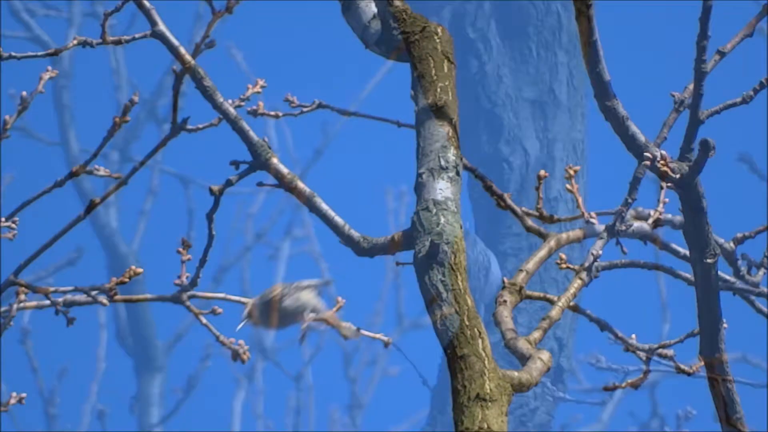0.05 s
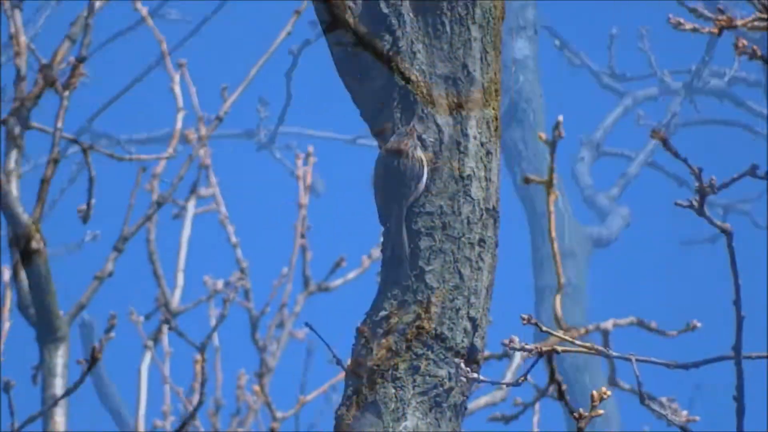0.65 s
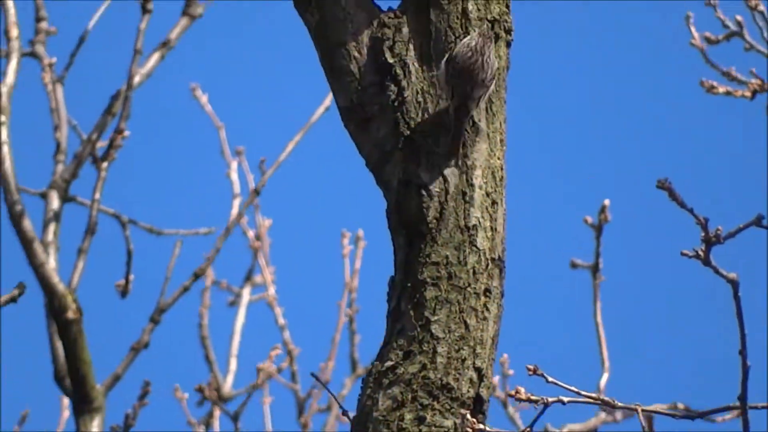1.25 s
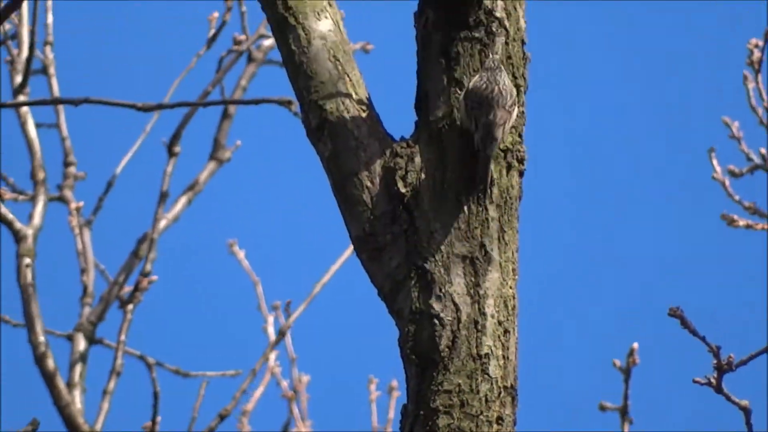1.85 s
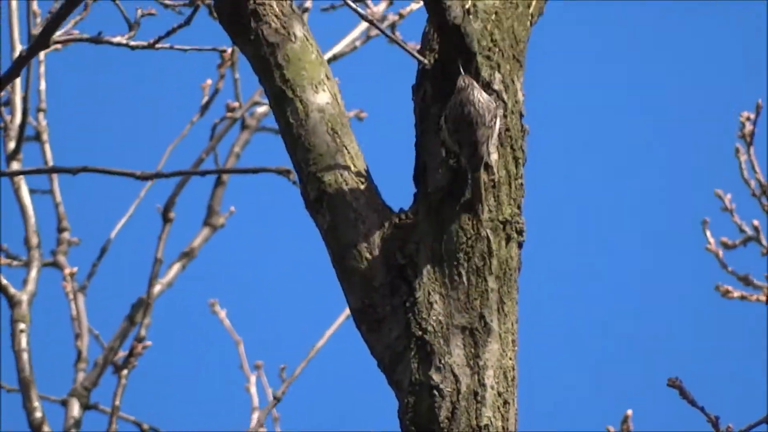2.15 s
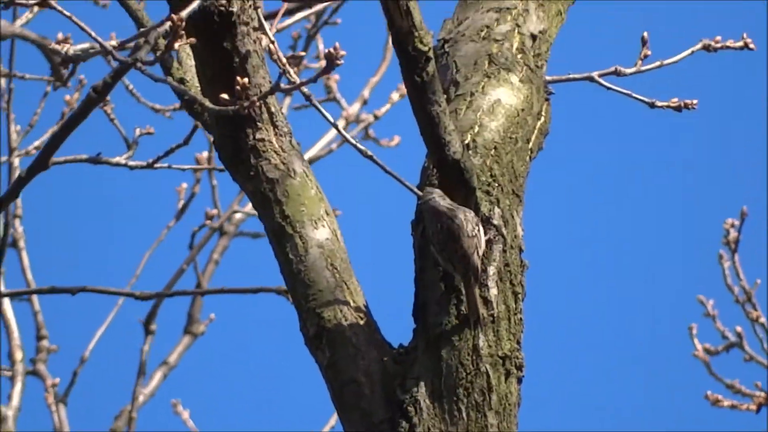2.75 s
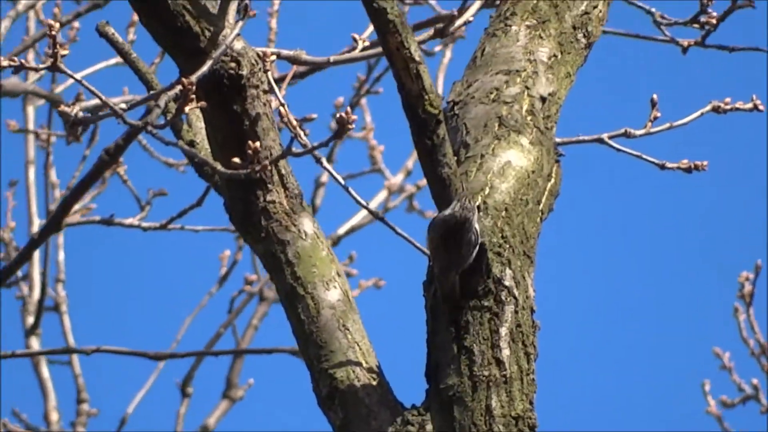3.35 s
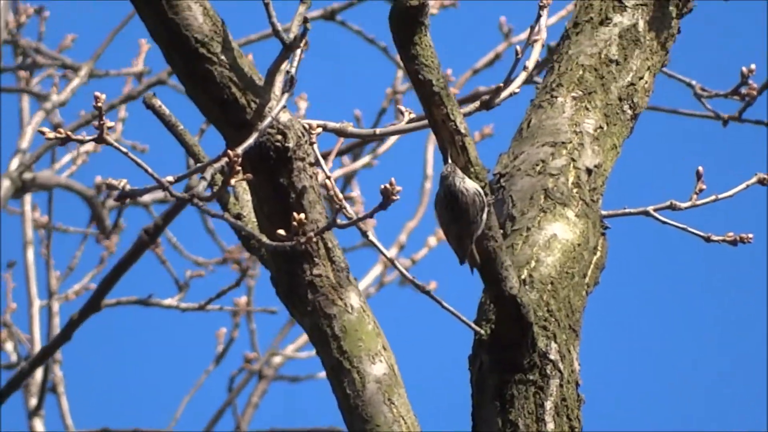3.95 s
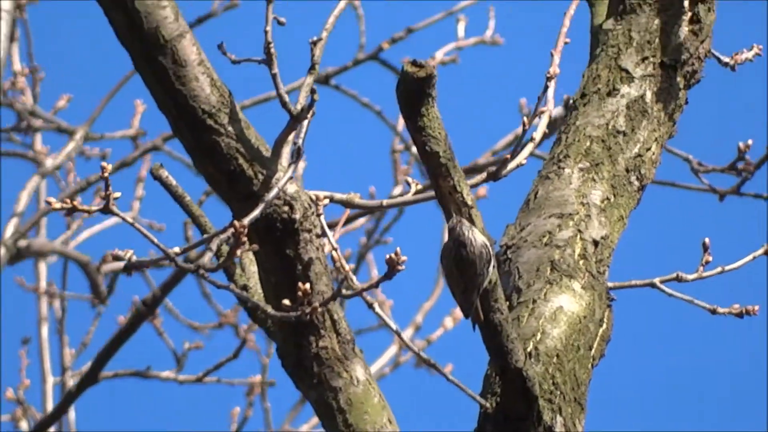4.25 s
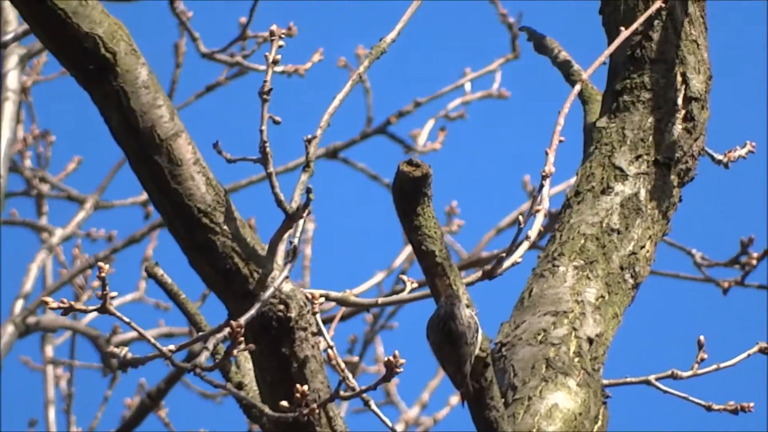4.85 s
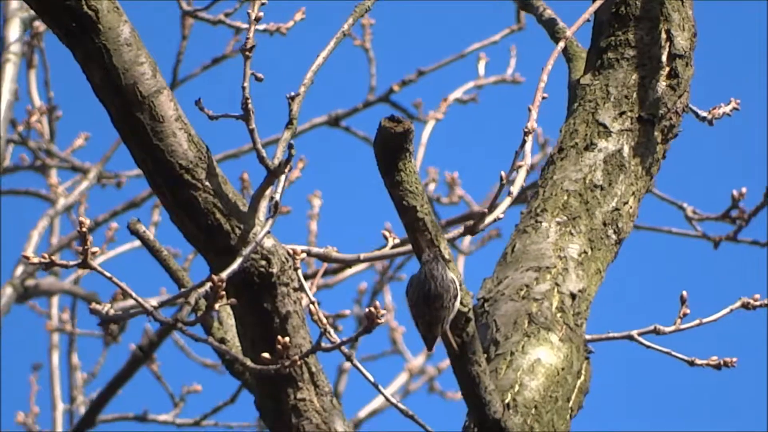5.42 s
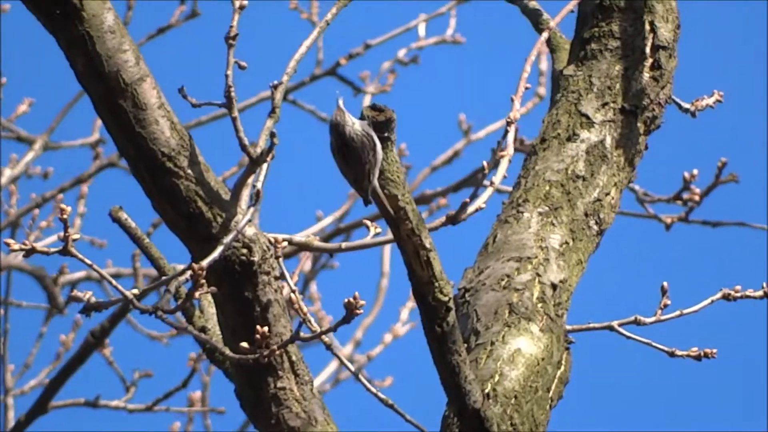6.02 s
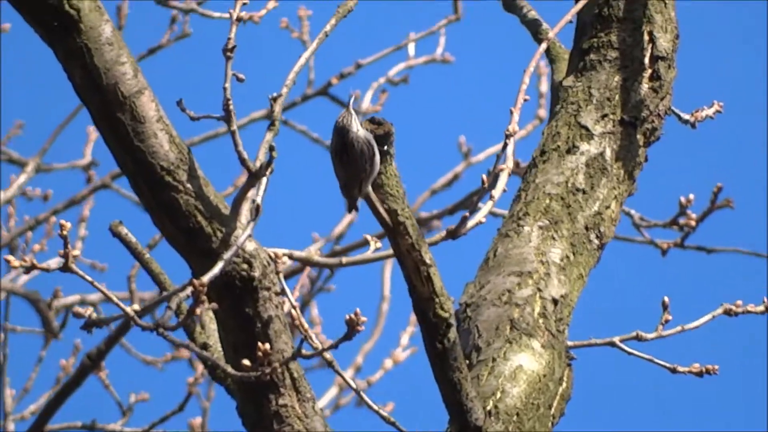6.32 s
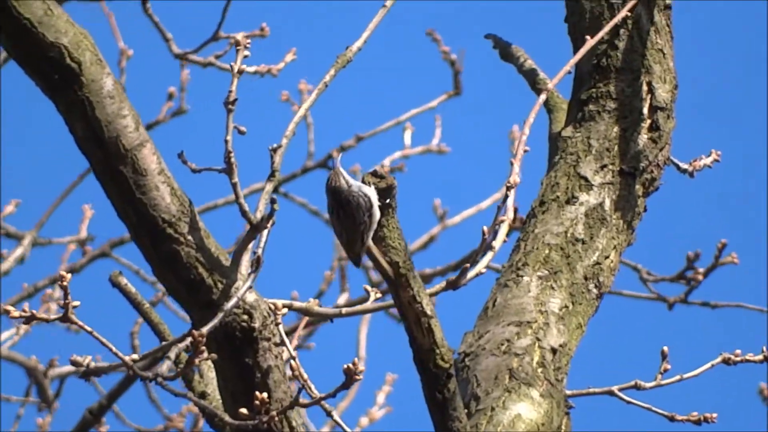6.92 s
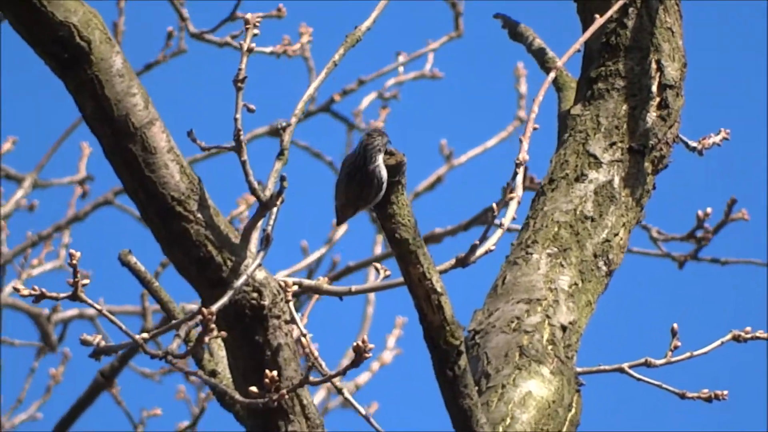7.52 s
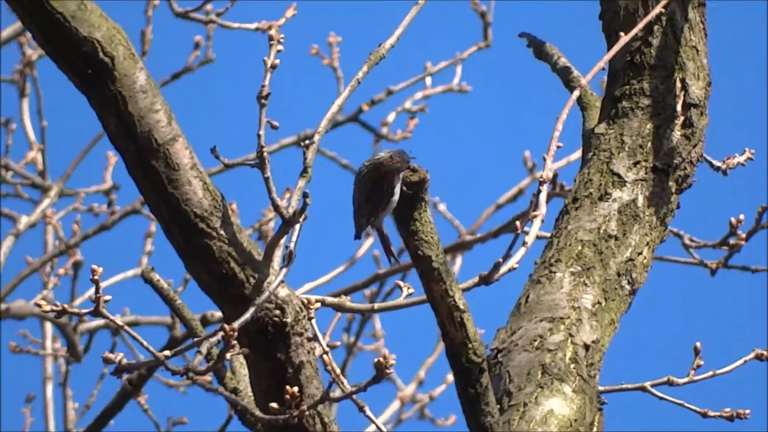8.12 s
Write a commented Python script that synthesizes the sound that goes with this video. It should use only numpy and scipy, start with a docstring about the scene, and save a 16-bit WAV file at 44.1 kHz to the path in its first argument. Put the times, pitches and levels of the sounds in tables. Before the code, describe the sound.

Small birds warble in a quiet wood, with one sharp click, a slowing, falling series of whistles, then a close, thin song ending in a trill.

```python
"""Warblers slur falling phrases over a faint hush in a bare wood in early spring. One sharp click snaps
close by; just after it the hush drops abruptly and the opening songs stop short. The warbling resumes,
two piping calls follow, and a woodpecker gives twelve whistles that sink and slow. Last, a treecreeper
close by sings thin notes ending in a trill. The songs are gliding tones with a slight tremor; trunks
scatter every call, and the distant birds arrive mostly as echo."""
import sys
import numpy as np
from scipy import signal
from scipy.fft import rfft, irfft, next_fast_len
from scipy.io import wavfile
from scipy.ndimage import uniform_filter1d

SR = 44100
rng = np.random.default_rng(int(sys.argv[2]) if len(sys.argv) > 2 else 0)


def transcribe(u):
    """Save the signal u as a 16-bit wav file named by the first command-line argument.

    u: samples, shape (n,) or (channels, n), limited to [-1, 1]; the rate is SR.
    q: integer samples, one column per channel.
    """
    v = np.clip(np.atleast_2d(u).T, -1, 1)
    q = np.round(v * 32767).astype(np.int16)
    wavfile.write(sys.argv[1], SR, q)


N = 360738
TIME = np.arange(N) / SR
PROGRESS = np.linspace(0, 1, 101)   # the way through a note, start to end
DROP_S = 1.205   # the hush drops and the opening songs stop


def from_db(db):
    return 10 ** (np.asarray(db) / 20)


def unit_rms(x):
    return x / np.sqrt(np.mean(x ** 2) + 1e-20)


def fader(points):
    """A level curve in dB, sample by sample."""
    return np.interp(TIME, *np.transpose(points))


def at_hz(points, hz):
    """Read a table on a log-frequency axis."""
    freqs, values = np.transpose(points)
    return np.interp(np.log(hz + 1e-9), np.log(freqs), values)


def add(track, start_s, sound):
    """Mix a sound into a track."""
    at = round(start_s * SR)
    first, last = max(at, 0), min(at + len(sound), N)
    track[first:last] += sound[first - at:last - at]


def pan(x, left_db):
    """Lean a sound left by a level difference; negative leans right."""
    return x * from_db(np.array([[left_db], [-left_db]]) / 2)


def contour(start, length, hz, db):
    """One note as points of (time [s], pitch [Hz], level [dB])."""
    return np.column_stack(np.broadcast_arrays(start + length * PROGRESS, hz, db))


def swell(edge_db):
    """Envelope of a slurred note in dB: loudest in its middle."""
    return edge_db * (2 * PROGRESS - 1) ** 2


def held(length, attack_s, release_s, edge_db):
    """Envelope of a held note in dB: attack, hold, release."""
    t = length * PROGRESS
    return edge_db * np.maximum(np.maximum(1 - t / attack_s, 1 - (length - t) / release_s), 0)


def syrinx(note, waver, glide_s=.0039):
    """Phase and amplitude of a bird's whistle gliding along a contour, with a slight pitch tremor."""
    s, hz, db = np.transpose(note)
    t = np.arange(s.min(), s.max(), 1 / SR)
    width = max(int(glide_s * SR), 2)
    tremor = unit_rms(uniform_filter1d(rng.standard_normal(len(t)), width))
    pitch = uniform_filter1d(np.interp(t, s, hz), width) * (1 + waver * tremor)
    edges = np.clip(np.minimum(t - t[0], t[-1] - t) / .00084, 0, 1)
    return 2 * np.pi * np.cumsum(pitch) / SR, np.sqrt(2) * from_db(np.interp(t, s, db)) * edges


def sing(notes, waver, octave_db=-50):
    """Nearly pure whistles with a trace of the octave."""
    out = np.zeros(N)
    for note in notes:
        phase, amplitude = syrinx(note, waver)
        add(out, note[0][0], amplitude * (np.sin(phase) + from_db(octave_db) * np.sin(2 * phase)))
    return out


# Stereo image of the air: (frequency [Hz], left-right coherence [0-1])
COHERENCE = [(60, 1), (150, 0.91), (500, 0.78), (2000, 0.3), (4000, 0.47), (7000, 0.71), (11000, 0.41)]


def stereo_noise(spectrum, size=N):
    """Coloured noise from all round, near mono in the bass; rms 1."""
    length = next_fast_len(size)
    hz = np.fft.rfftfreq(length, 1 / SR)
    mid, side = rfft(rng.standard_normal((2, length)))
    alike = np.clip(at_hz(COHERENCE, hz), 0, 1)
    both = np.sqrt(1 + alike) * mid + np.sqrt(1 - alike) * side * [[1], [-1]]
    return unit_rms(irfft(both * from_db(at_hz(spectrum, hz)), length)[:, :size])


# Reverb tail of the wood: (frequency [Hz], time to fall 60 dB [s])
WOOD_T60 = [(700, 1.84), (2000, 1.55), (4000, 0.88), (6500, 0.57), (10000, 0.34)]


def wood(x, echo_db, near_db, direct_db=0):
    """Direct sound, a quick scatter off the nearest trunks, and a tail that dies sooner in the treble."""
    size = int(1.5 * SR)
    t = TIME[:size]
    scatter = stereo_noise([(100, 0), (10000, 0)], size=size)
    scatter = scatter + 1.6 * scatter.mean(0)   # echoes are mostly alike in both ears, so they sit with the caller
    hz, frame_s, cells = signal.stft(unit_rms(scatter), SR, nperseg=256)
    decay = from_db(-60 * frame_s / at_hz(WOOD_T60, hz)[:, None])
    tail = signal.istft(cells * decay, SR)[1][:, :size]
    tail = tail * (1 - np.exp(-t / .021)) / np.sqrt(.046 * SR)
    reflections = rng.standard_normal(size) * (rng.random(size) < 900 / SR)
    trunks = reflections * np.exp(-t / .044) * (t > .005)
    response = from_db(echo_db) * tail + from_db(near_db) * trunks / np.linalg.norm(trunks)
    return from_db(direct_db) * x + signal.fftconvolve(x[None], response, axes=1)[:, :N]


# EQ of each layer of the ambience bed: (frequency [Hz], relative density [dB])
RUMBLE_EQ = [(12, -30.5), (22, -4.5), (43, -2.5), (63, 0.5), (80, -4), (135, -14.5), (200, -25.5),
             (440, -67)]
WIND_EQ = [(100, -12), (180, -6), (330, -1), (600, -1.5), (1000, -5), (1400, -11), (1750, -11), (2300, -24),
           (4000, -22), (8000, -37.5)]
HISS_EQ = [(1000, -10), (2500, 8), (4000, 5.5), (7000, 1), (9500, -3.5), (11000, -5.5), (14000, -6.5)]
MURMUR_EQ = [(150, -11), (300, -4.5), (550, 5), (700, 9.5), (900, -4), (1100, 4), (1500, -32.5),
             (3500, -49), (6000, -36)]
# Their fader rides: (time [s], level [dB])
RUMBLE_FADER = [(0, -75), (1.19, -73), (1.23, -80), (2.7, -80.5), (3.7, -76.5), (4.8, -73.5), (5.7, -76),
                (7.7, -69), (8.18, -75.5)]
WIND_FADER = [(1.25, -77), (3.7, -75), (4.8, -74), (7.8, -70.5), (8.18, -74.5)]
HISS_FADER = [(0, -78.5), (1.2, -80.5), (1.21, -83.5), (3.6, -82), (4.5, -80), (8.18, -81)]
MURMUR_FADER = [(0, -100), (7.3, -89.5), (7.52, -72), (7.78, -79), (7.88, -68), (8.18, -68.5)]


def hush(rumble_trim_db=.5, opening_wind_boost_db=5):
    """Low rumble, far wind in the trees and fine hiss; a murmur of wind swells at the end."""
    rumble = from_db(fader(RUMBLE_FADER) + rumble_trim_db) * stereo_noise(RUMBLE_EQ)
    wind = from_db(fader(WIND_FADER) + opening_wind_boost_db * (TIME < DROP_S)) * stereo_noise(WIND_EQ)
    hiss = from_db(fader(HISS_FADER)) * stereo_noise(HISS_EQ)
    murmur = from_db(fader(MURMUR_FADER)) * stereo_noise(MURMUR_EQ)
    return rumble + wind + hiss + murmur


# Thin notes far up in the crowns: (start [s], length [s], level [dB], pitch [Hz])
CROWN_NOTES = [(.20, 0.071, -91, 7600), (.39, .09, -92, 7620), (0.587, 0.1, -87.5, 7850),
               (.64, 0.22, -91, 8320), (.93, 0.16, -80, 8110), (7.58, .18, -91.5, 7680),
               (7.93, .25, -95, 5140)]


def crown_bird():
    """A small bird holds faint, slightly unsteady notes, each on one pitch."""
    notes = [contour(s, length, hz, db + swell(edge_db=-1)) for s, length, db, hz in CROWN_NOTES]
    return sing(notes, waver=.009)


# Fader ride of the birds deeper in the wood: (time [s], level [dB])
TWITTER_FADER = [(0, -79), (1.3, -91), (2.8, -69), (3.6, -74), (4.7, -72.5), (5.6, -82), (7.5, -84),
                 (7.95, -76.5)]


def twitter(count=130, slur_spread=.13):
    """Short random slurs from far off, heard mostly by their echo."""
    chance = rng.random((count, 3))
    starts = (np.arange(count) + chance[:, 0]) * TIME[-1] / count
    lengths = .03 + .04 * chance[:, 1]
    slurs = np.exp(slur_spread * rng.standard_normal((count, 1)) * (2 * PROGRESS - 1))
    pitches = 3150 * 1.45 ** chance[:, 2:] * slurs
    levels = np.interp(starts, *np.transpose(TWITTER_FADER))[:, None] + swell(edge_db=-9.5)
    song = sing([contour(*note) for note in zip(starts, lengths, pitches, levels)], waver=.015)
    return wood(song, echo_db=0, near_db=-5, direct_db=-9)


# Calls of a big bird far away: (start [s], length [s], level [dB])
HOARSE_CALLS = [(5.44, .085, -75), (5.668, 0.16, -66), (5.958, .147, -64), (6.20, 0.19, -67)]


def hoarse_bird(foot_hz=717, top_hz=834, fifth_db=-15):
    """A rough, low, arching voice with a weaker partial a fifth above; distance leaves mostly echo."""
    hz = foot_hz + (top_hz - foot_hz) * np.sin(np.pi * PROGRESS)
    root = [contour(s, length, hz, db + swell(edge_db=-1)) for s, length, db in HOARSE_CALLS]
    fifth = [contour(s, length, 1.5 * hz, db + fifth_db + swell(edge_db=-4))
             for s, length, db in HOARSE_CALLS]
    return wood(sing(root + fifth, waver=.07), echo_db=-8, near_db=-6.5, direct_db=-5.5)


# Warbler notes on one pitch: (start [s], length [s], level [dB], pitch [Hz])
FLAT_NOTES = [(.36, 0.072, -62, 3833), (1.06, 0.012, -66, 2870), (1.15, 0.11, -63.5, 3134),
              (1.25, 0.067, -82, 3610), (1.56, 0.051, -81.5, 5790), (1.72, 0.065, -71, 4420),
              (1.78, .07, -75.5, 3560), (1.795, 0.033, -71, 6230), (5.06, 0.054, -74.5, 4140),
              (7.565, 0.037, -78, 4020)]
# Their four slurs: (start [s], length [s], level [dB], lowest pitch [Hz], highest pitch [Hz])
SCOOPS = [(.725, .092, -63.5, 3090, 5100), (.925, .103, -64.5, 3050, 5240), (1.91, 0.06, -69.5, 4210, 6500),
          (2.06, 0.078, -67, 3930, 6420), (2.21, .085, -73, 5000, 6400), (2.39, 0.05, -68.5, 5010, 5510),
          (2.565, 0.093, -65, 3296, 6000), (3.165, .13, -62, 3473, 5100), (3.37, 0.12, -63.5, 3180, 5100)]
FALLS = [(-.02, 0.044, -57.5, 3914, 4900), (.10, 0.048, -63, 3504, 3680), (.69, .04, -63, 3400, 3600),
         (.295, 0.065, -62.5, 3820, 5260), (1.61, 0.037, -74, 4480, 5700), (2.295, 0.037, -66, 3990, 5200),
         (2.46, 0.04, -64.5, 3890, 5060), (2.77, 0.065, -60.5, 3804, 5300),
         (3.58, 0.069, -62.5, 3040, 3860), (3.67, 0.043, -63.5, 3070, 4250),
         (3.79, 0.055, -61.5, 2734, 4200), (4.305, 0.055, -68.5, 2430, 3600),
         (4.485, 0.056, -59, 2490, 5000), (4.84, 0.096, -64.5, 2770, 3990), (5.755, 0.057, -73, 3680, 4100),
         (7.725, 0.041, -78.5, 3310, 4200), (7.87, 0.044, -70.5, 3260, 4050),
         (8.11, 0.061, -76.5, 2750, 3530)]
RISES = [(.14, 0.075, -61, 3600, 5420), (.89, 0.038, -65, 2750, 3790), (1.775, 0.023, -74, 5300, 6300),
         (2.62, .075, -63.5, 3780, 5530), (2.885, 0.031, -67.5, 4350, 5850), (3.87, 0.052, -64, 2520, 3200),
         (4.05, 0.04083, -61, 2660, 3230), (4.21, 0.041, -61, 2650, 3290),
         (4.375, 0.043, -60.5, 2644, 3260), (7.525, 0.044, -77.5, 2800, 3870)]
ARCHES = [(.498, 0.048, -68, 4460, 6250), (.545, 0.062, -62, 3640, 4170), (1.10, 0.046, -65, 3010, 3740),
          (2.985, 0.043, -65.5, 4600, 6240), (3.045, 0.046, -63.5, 3500, 4320),
          (6.07, .07, -65, 4540, 4930), (7.275, 0.032, -80, 3500, 3910), (7.40, 0.031, -72, 3440, 3870),
          (7.985, 0.033, -78.5, 3340, 4150)]
# Throat resonance: (frequency [Hz], gain [dB])
THROAT_EQ = [(2500, -2), (3300, -1.5), (3850, 2.5), (4200, 7.5), (4600, -2.5), (5500, 1), (6400, -2.5)]
# The later song comes less directly as the singer turns away: (time [s], direct gain [dB])
WARBLER_DIRECT = [(1.7, -4), (2.5, 0), (3.1, -6), (3.4, -7), (5.0, -5), (7.3, -1)]


def warblers(opening, waver, scoop_turn=.34):
    """The phrases before (opening) or after the drop; notes flare as they cross the throat resonance."""
    slurs = [(SCOOPS, abs((PROGRESS - scoop_turn) / (1 - scoop_turn)) ** 1.6),   # dip, then sweep up
             (FALLS, (1 - PROGRESS) ** 1.6),   # drop quickly, then ease
             (RISES, 1 - (1 - PROGRESS) ** 1.4),   # climb quickly, then level off
             (ARCHES, abs(np.sin(np.pi * PROGRESS)) ** 1.3)]   # up and down again
    slurred = [(s, length, db, low + (high - low) * height)
               for rows, height in slurs for s, length, db, low, high in rows]
    notes = [contour(s, length, hz, db + swell(edge_db=-4))
             for s, length, db, hz in FLAT_NOTES + slurred if (s < DROP_S) == opening]
    size = next_fast_len(N + SR // 10)
    throat = from_db(at_hz(THROAT_EQ, np.fft.rfftfreq(size, 1 / SR)))
    song = irfft(rfft(sing(notes, waver), size) * throat, size)[:N]
    if opening:
        return wood(song, echo_db=-6, near_db=-11.5) * (TIME < DROP_S)   # stops short, echo and all
    return wood(song, echo_db=-6, near_db=-7, direct_db=fader(WARBLER_DIRECT))


# Raspy chips leading into the piping calls: (start [s], length [s], level [dB])
RASPS = [(2.598, 0.063, -66), (2.874, 0.1, -68.5)]
# Their EQ: (frequency [Hz], relative density [dB])
RASP_EQ = [(2200, -37), (2900, -2.5), (4200, -1), (6000, -5), (6700, -13.5), (9000, -32)]


def rasps():
    """Brief toneless bursts of a harsh voice."""
    out, noise = np.zeros(N), stereo_noise(RASP_EQ)[0]
    for s, length, db in RASPS:
        burst = noise[round(s * SR):round((s + length) * SR)]
        add(out, s, from_db(db) * burst * np.hanning(len(burst)))
    return out


# Two piping calls: (start [s], length [s], level [dB], held pitch [Hz])
PIPING_CALLS = [(2.649, 0.094, -50, 4262), (2.94, 0.096, -48.5, 4234)]


def piping(slide_hz=872, slide_s=.007):
    """Each call slides up onto its pitch and holds it."""
    notes = [contour(s, length, hz - slide_hz * np.exp(-length * PROGRESS / slide_s),
                     db + held(length, attack_s=.013, release_s=.0092, edge_db=-12))
             for s, length, db, hz in PIPING_CALLS]
    return sing(notes, waver=.004)


# One sharp click and three soft ticks: (time [s], level [dB], treble roll-off [Hz])
CLICKS = [(0.9266, -20.5, 16000), (2.21, -47, 3150), (3.255, -60, 991), (6.358, -55.5, 9000)]
# Their ring: (frequency [Hz], relative level [dB], time to fall 60 dB [s])
CLICK_MODES = [(450, -35.5, 0.039), (599, -27, 0.025), (730, -28, 0.074), (1240, -25.5, 0.023),
               (1658, -24, 0.044), (1930, -23.5, 0.024), (2380, -20.5, 0.025), (2720, -25.5, 0.037),
               (3204, -11, 0.02), (3330, -3.5, 0.0082), (4180, -3, 0.012), (4770, -20, 0.012),
               (5100, -17, 0.019), (6120, -15, 0.01), (7470, -9.5, 0.0053), (8620, -4, 0.0058)]


def clicks(attack_s=.00025):
    """Dry snaps that ring very briefly; each has its own dullness, which leaves the high modes quieter in some."""
    out, t = np.zeros(N), TIME[:SR // 10]
    for s, level_db, dull_hz in CLICKS:
        ring = np.zeros(len(t))
        for k, (hz, db, t60) in enumerate(CLICK_MODES):
            mode = from_db(db - 60 * t / t60) * np.sin(2 * np.pi * hz * t)
            ring += (-1) ** k * mode / (1 + (hz / dull_hz) ** 2)
        add(out, s, from_db(level_db) * ring * (1 - np.exp(-t / attack_s)))
    return out


# The woodpecker's series: (start [s], level [dB], pitch [Hz])
PECKER_WHISTLES = [(3.8457, -48.5, 2158), (4.0053, -45.5, 2116), (4.1614, -45.5, 2114),
                   (4.3116, -44.5, 2098), (4.4772, -44, 2071), (4.6304, -43.5, 2057), (4.8065, -46.5, 1996),
                   (4.9953, -46.5, 1960), (5.2053, -51, 1916), (5.4157, -49.5, 1932), (5.6245, -53.5, 1893),
                   (5.8636, -54, 1896)]
# Gesture of one whistle, drooping at its end: (offset [s], pitch [ratio], relative level [dB])
PECKER_GESTURE = [(-.005, .99, -14), (.003, 1.006, -3), (0.018, 1.006, -0.5), (0.038, .988, -4),
                  (.048, .96, -3), (.058, 0.91, -18)]
# Its bright edge: (harmonic [number], relative level [dB])
PECKER_OVERTONES = [(3, 3.5), (4, -21), (5, -28)]
# Mostly echo at first, then more present: (time [s], direct gain [dB])
PECKER_DIRECT = [(3.85, -9), (4.3, 0), (5.0, 1.5), (5.9, 4)]


def woodpecker(trim_db=-3, bright_db=-15.5, scoop_depth=.033, scoop_s=.012):
    """As the whistles slow they scoop up more, the octave fades and a rasp at 3/2 of the pitch grows."""
    out = np.zeros(N)
    offset, ratio, gesture_db = np.transpose(PECKER_GESTURE)
    for (s, db, hz), late in zip(PECKER_WHISTLES, np.linspace(0, 1, len(PECKER_WHISTLES))):
        scoop = scoop_depth * late * np.exp(-(offset - offset[0]) / scoop_s)
        note = np.c_[s + offset, hz * (ratio - scoop), db + trim_db + gesture_db]
        phase, amplitude = syrinx(note, waver=.0085, glide_s=.0022)
        octave = from_db(np.interp(late, [0, 1], [-8, -17])) * np.sin(2 * phase)
        rasp = from_db(np.interp(late, [0, 1], [-32, -17])) * np.sin(1.5 * phase)
        edge = sum(from_db(bright_db + level) * np.sin(k * phase) for k, level in PECKER_OVERTONES)
        effort = amplitude / amplitude.max()   # overtones fade faster than the fundamental
        add(out, s + offset[0], amplitude * (np.sin(phase) + effort * (octave + edge) + rasp))
    return wood(out, echo_db=-3.5, near_db=-7.5, direct_db=fader(PECKER_DIRECT))


def creeper_whistle(start, length, db, hz, dive_s, ease_db, lift_after_s, lift_hz, swell_db,
                    dive_hz=1640, ease_after_s=.018, ease_s=.017, lift_s=.014):
    """A dive onto a held pitch; the bird eases off, then pushes harder and the pitch lifts."""
    t = length * PROGRESS
    dive = np.cos(np.pi / 2 * np.minimum(t / dive_s, 1)) ** 2
    ease = np.exp(-((t - dive_s - ease_after_s) / ease_s) ** 2)
    push = (1 + np.tanh((t - lift_after_s) / lift_s)) / 2
    envelope = held(length, attack_s=.025, release_s=.0073, edge_db=-19)
    pitch = hz + dive_hz * dive + lift_hz * push
    return contour(start, length, pitch, db + ease_db * ease + swell_db * push + envelope)


def creeper_hook(start, length, db, top_hz, end_hz, rising, flick_hz=1173, onset_db=-20, end_db=-13):
    """A flick up and a slide down, loudest halfway through the slide."""
    from_top = np.interp(PROGRESS, [0, rising, 1], [-1, 0, 1])
    hz = top_hz - np.where(from_top < 0, flick_hz, top_hz - end_hz) * abs(from_top) ** 1.7
    return contour(start, length, hz, db + np.interp(from_top, [-1, .5, 1], [onset_db, 0, end_db]))


def creeper_trill(start, length, db, rate, first_hz, last_hz, swing_hz, pulse_db=2, fade_db=-3.5):
    """The pitch swings about a climbing centre; the level pulses with each swing."""
    swing = -np.cos(2 * np.pi * rate * length * PROGRESS)
    hz = first_hz + (last_hz - first_hz) * PROGRESS + swing_hz * swing
    envelope = held(length, attack_s=.004, release_s=.006, edge_db=-9.5)
    return contour(start, length, hz, db + pulse_db * swing + fade_db * PROGRESS + envelope)


# The treecreeper's lead-in: (start [s], length [s], level [dB], held pitch [Hz], dive [s], ease [dB],
# lift after [s], lift [Hz], swell [dB])
CREEPER_WHISTLES = [(5.782, .126, -56, 5020, .019, -8, .052, 360, 9),
                    (6.028, .157, -40, 5465, .035, -8, .093, 85, 2.5),
                    (6.263, .177, -44.5, 4782, .022, -1, .135, 150, -.5),
                    (6.482, .16, -45, 4430, .027, -11, .072, 865, 3.5)]
# Its hooks: (start [s], length [s], peak [dB], top pitch [Hz], end pitch [Hz], share rising [0-1])
CREEPER_HOOKS = [(6.644, .048, -40, 7200, 5900, .43), (6.735, .046, -36.5, 6780, 5150, .2),
                 (6.806, .04, -40, 6180, 4750, .2), (6.984, .064, -33, 7130, 6150, .35)]
# Its trills: (start [s], length [s], level [dB], rate [Hz], first centre [Hz], last centre [Hz],
# swing [Hz])
CREEPER_TRILLS = [(6.85, .087, -37.5, 37, 5850, 6450, 600), (7.047, .151, -36.3, 34.8, 6600, 6680, 440)]


def treecreeper():
    """Four thin whistles up front, then a flourish of hooks and trills."""
    whistles = [creeper_whistle(*row) for row in CREEPER_WHISTLES]
    hooks = [creeper_hook(*row) for row in CREEPER_HOOKS]
    trills = [creeper_trill(*row) for row in CREEPER_TRILLS]
    return sing(whistles + hooks + trills, waver=.0016)


def scene():
    """The birds and clicks, each at its own depth in the wood, panned over the hush."""
    phrases = warblers(opening=True, waver=.0083) + warblers(opening=False, waver=.0065)
    crown_gate = (TIME < DROP_S) | (TIME > DROP_S + 2)
    crown = wood(crown_bird(), echo_db=4.5, near_db=-17) * crown_gate
    pipes = wood(piping() + rasps(), echo_db=-10, near_db=-10)
    creeper = wood(treecreeper(), echo_db=-10, near_db=-8)
    pecker = woodpecker()
    snaps = wood(clicks(), echo_db=-28.5, near_db=-29.5)
    right = pan(phrases + hoarse_bird() + snaps, left_db=-2)
    ahead = pan(creeper, left_db=.76) + crown + twitter()
    left = pan(pipes + pecker, left_db=4.5)
    return right + ahead + left + hush()


def record(dry):
    """A steep high cut at 11 kHz on the whole mix."""
    return signal.sosfilt(signal.ellip(10, .2, 70, 11000, fs=SR, output="sos"), dry)


dry = scene()
out = record(dry)
transcribe(out)
```